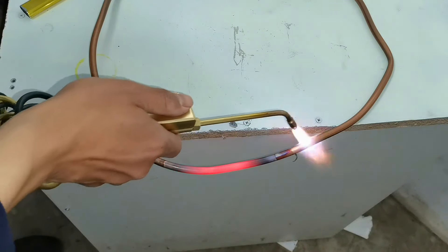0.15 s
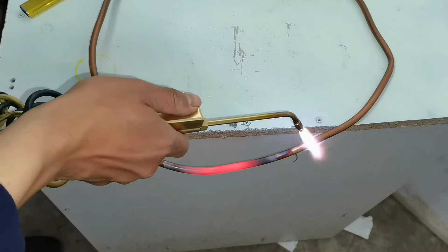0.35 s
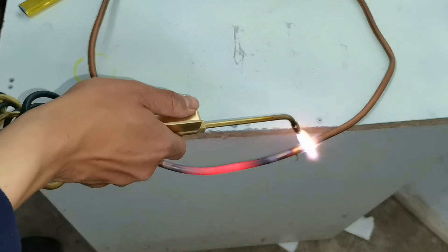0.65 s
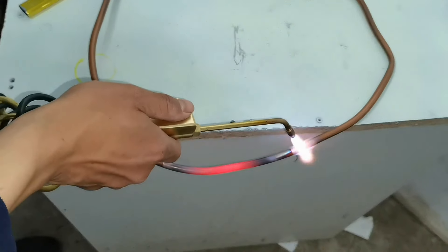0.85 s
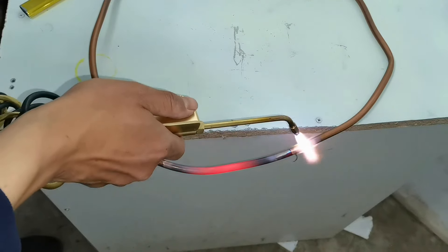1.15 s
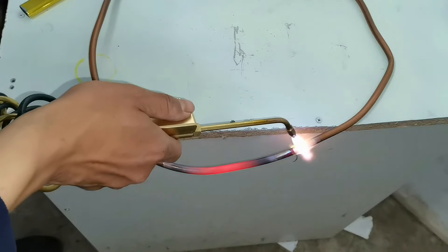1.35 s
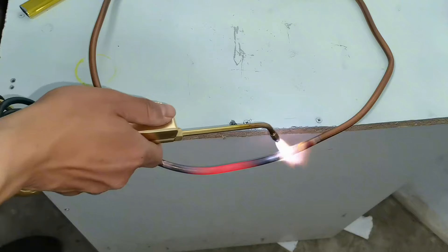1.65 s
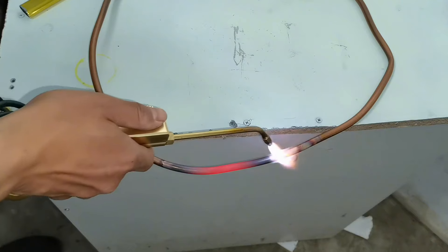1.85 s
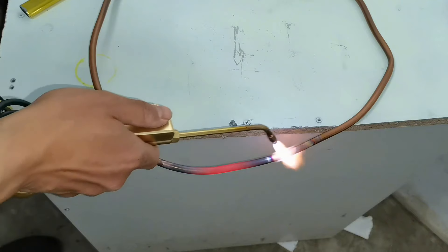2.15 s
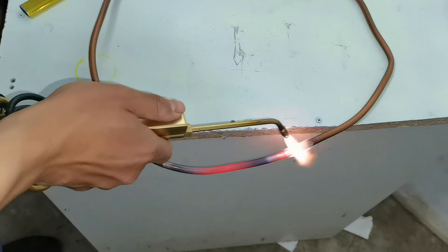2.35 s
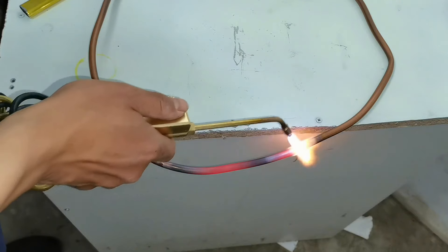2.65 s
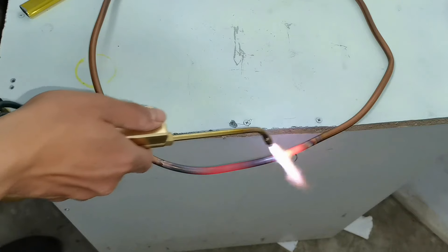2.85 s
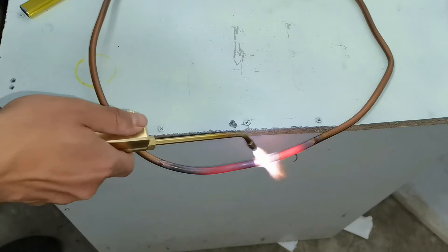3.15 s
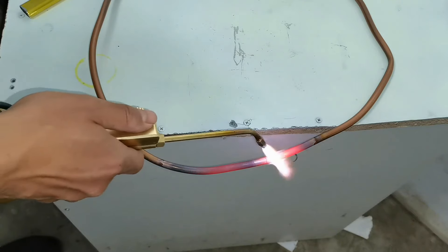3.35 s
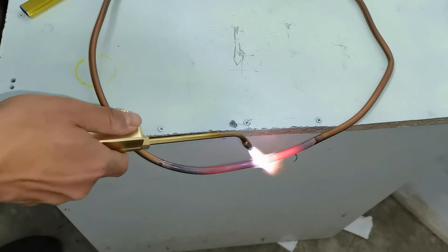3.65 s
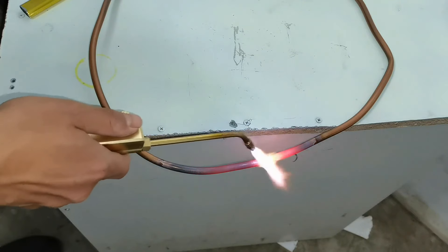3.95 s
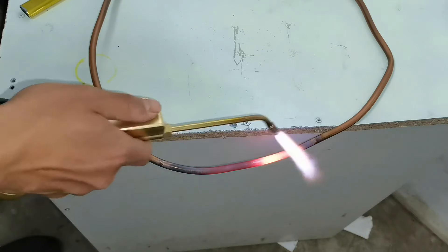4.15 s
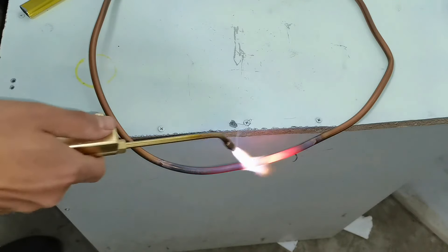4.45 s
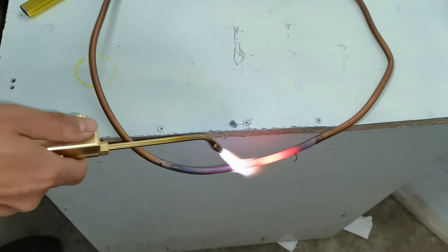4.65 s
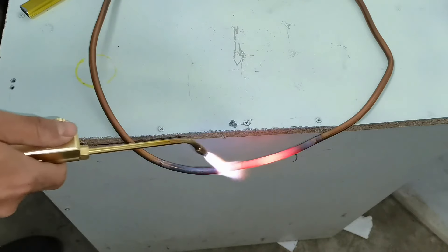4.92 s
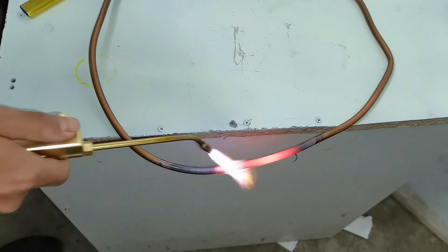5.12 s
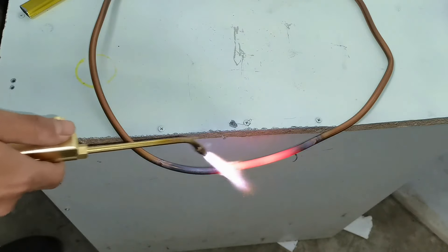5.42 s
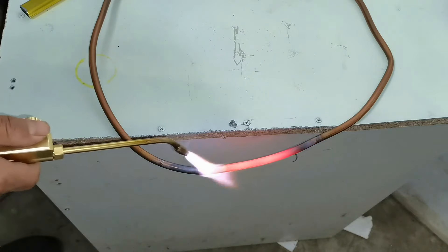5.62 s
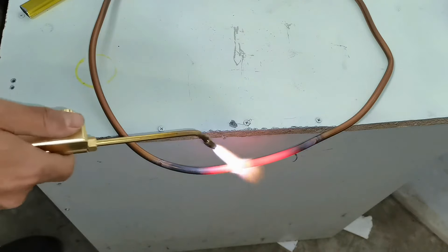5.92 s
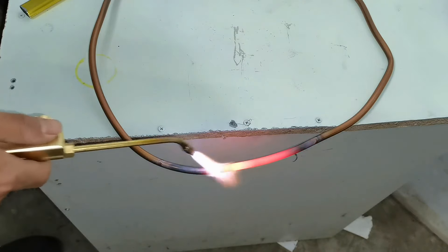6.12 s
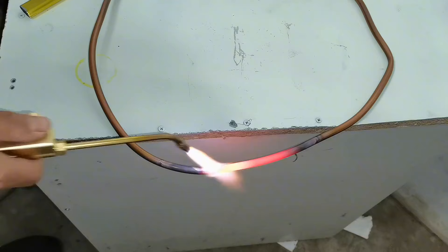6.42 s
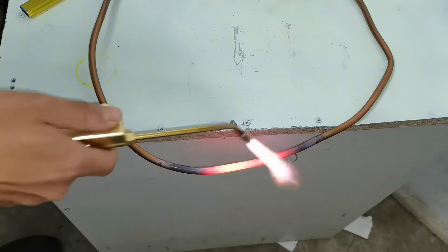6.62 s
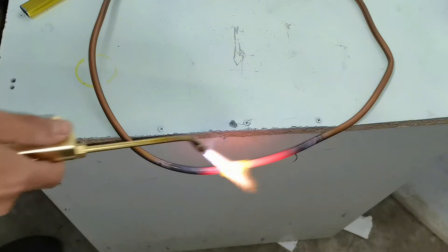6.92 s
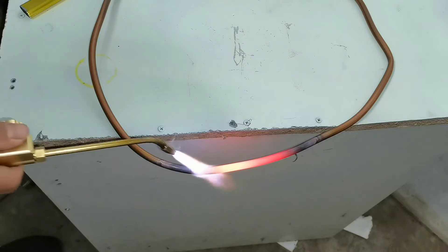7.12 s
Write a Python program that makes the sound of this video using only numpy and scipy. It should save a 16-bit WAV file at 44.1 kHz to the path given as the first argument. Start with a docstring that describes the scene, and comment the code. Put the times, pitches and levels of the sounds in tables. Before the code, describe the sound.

From 0 s a gas torch is already burning close to the microphone, giving a dense, bright, unbroken hiss strongest in the upper mids and treble. A faint fast flutter roughens it. Beneath is a quiet low purr of flame against a copper pipe. Brief soft roars come at about 0.4, 0.9 and 1.4 s, then at 2.7 and in a cluster from 3.2 s. At 3.8-4.3 s the flame burns free with a longer fluttering roar and a small surge in the hiss. More low puffs follow near 4.6, 5.2 and 6.2 s, then a fuller flare at 6.5-6.9 s with another surge. The hiss climbs gradually throughout, several decibels louder by 7.3 s, its color and position drifting slightly as the torch moves. Hard workshop walls add short, diffuse reflections; low rumble wavers faintly underneath. It ends still burning.

```python
"""A gas torch's jet hisses, ever louder: shaped noise for the eddies sheared off at the nozzle.
Its flame purrs against a copper pipe and flares into a fluttering roar when it slips past and burns free.
The hand moves the torch along the pipe: delays drift the hiss sideways and slide its reflections.
The hard-walled workshop adds diffuse noise tails and a low rumble; the microphone is close."""
import sys
import numpy as np
from scipy import signal
from scipy.fft import rfft, irfft
from scipy.io import wavfile
from scipy.ndimage import uniform_filter1d, map_coordinates

SR = 44100
rng = np.random.default_rng(int(sys.argv[2]) if len(sys.argv) > 2 else 0)


def int16_out(signal):
    """Quantize to a 16-bit WAV file."""
    q = np.round(np.clip(np.atleast_2d(signal).T, -1, 1) * 32767)
    wavfile.write(sys.argv[1], SR, q.astype(np.int16))


N = 321048
TIME_S = np.arange(N) / SR
FRAME_S = np.arange(N // 256 + 5) * 256 / SR
BIN_HZ = np.fft.rfftfreq(1024, 1 / SR)

# jet growing louder, before trim: start_s, level_db
JET_LEVEL = [(0, -24), (0.3, -23.5), (0.5, -22.5), (1.15, -22), (2.0, -21), (2.45, -22), (2.9, -20.5),
             (3.28, -21), (4.15, -20), (4.58, -19.5), (5.05, -19.5), (5.9, -19), (6.55, -20), (6.82, -18.7),
             (7.28, -18.5)]
# torch place as lag of left ear behind right: start_s, left_lag_ms
TORCH_PLACE = [(0, 0.03), (1.2, 0.023), (1.6, 0.009), (2.5, 0.024), (3.05, -0.016), (3.3, -0.0061),
               (4.2, -0.00035), (4.5, -0.038), (4.9, -0.079), (5.3, -0.045), (5.6, -0.1), (6, -0.058),
               (6.35, -0.12), (6.65, -0.019), (6.85, -0.039), (7.05, -0.1)]
# relative jet spectrum, nozzle close to pipe or drawn back: freq_hz, close_db_per_hz, back_db_per_hz
HISS_COLOUR = [(200, -36, -37), (720, -27, -25), (950, -19.5, -22), (1650, -16.2, -17.8),
               (2200, -11.8, -12.2), (3060, -7.8, -6), (3380, -2.2, -5.2), (4300, -.8, -3.1),
               (5200, -.7, -1.4), (6500, -1.1, -1.9), (8050, -2.7, -4.4), (8850, -7.6, -8.2),
               (11000, -8.5, -8.8), (13000, -10.8, -11.9), (15200, -13, -12.9)]
# nozzle withdrawal: start_s, share_0_to_1
DRAWN_BACK = [(0, 0.4), (1.8, 0.3), (3.6, 0.25), (4.2, 0.8), (4.6, 1), (7.28, 0.85)]
# narrow hiss resonances, each strongest at one torch place: freq_hz, gain_db, place_ms
RINGS = [(2070, 2, 0.013), (2480, -2, -0.061), (2880, 5, -0.07), (3220, 6.5, 0.0043), (3470, 7, -0.0071),
         (3740, 5.5, 0.014), (3850, 3, -0.013), (4560, 4.5, 0.016), (4970, 3, 0.014), (5170, 5.5, -0.069),
         (5860, 1, -0.07), (6580, 3.5, 0.0049), (7540, 7.5, -0.0063), (8000, 6, 0.0096)]
RING_WIDTH_HZ, RING_REACH_MS = 80, 0.039
# hiss surges where the flame swings wholly clear of the pipe: middle_s, length_s, gain_db
SURGES = [(4.24, 0.24, 1.1), (6.76, 0.28, 0.8)]
SURGE_HZ, SURGE_WIDTH_HZ = 5960, 2300
# relative flame spectrum: freq_hz, level_db_per_hz
ROAR_COLOUR = [(25, -32), (50, -33), (90, -27), (120, -3.5), (165, -0.5), (220, 1), (310, 0), (410, -4.5),
               (540, -9), (700, -11), (920, -8.5), (1400, -16), (3000, -14)]
# flame slips past the pipe and burns free; levels before trim: start_s, length_s, level_db
FLARES = [(-0.05, 0.085, -42), (0.37, 0.32, -43), (0.89, 0.49, -45.5), (1.407, 0.12, -40.5),
          (2.72, 0.18, -41), (3.18, 0.17, -42), (3.345, 0.15, -41.5), (3.55, 0.13, -46), (3.838, 0.5, -40),
          (4.35, 0.12, -45), (4.614, 0.48, -46), (5.183, 0.24, -40), (6.154, 0.27, -40), (6.517, 0.4, -39),
          (7.06, 0.25, -50)]
FLARE_ATTACK_TANH_S, FLARE_RELEASE_TANH_S = 0.033, 0.045
# purr against the pipe, before trim
PURR_START_DB, PURR_RISE_DB_PER_S = -50, 0.47
# low workshop mode
BOOM_HZ, BOOM_WIDTH_HZ, BOOM_DB = 216, 42, 2
# mirror paths off board, bench, floor: extra_delay_ms, delay_slope_ms_per_place_ms, gain_db
MIRRORS = [(.3, -0.9, -26), (.74, -2, -54), (1.58, 3.3, -35), (2.45, -3.5, -15), (4.55, -1.6, -17)]
# diffuse sound against direct: freq_hz, level_db, t60_s
ROOM = [(100, -42, .3), (302, -12, 0.22), (597, 2.5, 0.087), (1240, 3, 0.13), (3450, 2.5, 0.087),
        (6500, 0, 0.15), (11800, 11, 0.041), (15000, 2, 0.076)]
# relative rumble spectrum: freq_hz, level_db_per_hz
RUMBLE_COLOUR = [(15, -36), (26, -17), (42, -3), (60, 0), (90, -5), (130, -5), (300, -6), (1000, -18),
                 (5000, -37)]
# rumble swelling and sinking, before low cut: start_s, level_db
RUMBLE_LEVEL = [(0, -64), (1.2, -62), (2.2, -71), (3.2, -63), (4.2, -60), (5, -62.5), (6, -63), (6.6, -59),
                (7.28, -57)]
# microphone port resonances: freq_hz, left_minus_right_db, left_lead_rad
PORTS = [(220, 1.4, -0.25), (500, 0.4, -0.45), (2500, 1.3, -0.19), (5100, 0.4, 0.38), (7000, 3.6, -0.58),
         (7630, 9, 0.63), (8650, 1.5, -0.57), (9800, -5, -2.7), (10300, -1, -0.36), (11700, -7.5, .9),
         (12600, 0.5, .4)]
DIP_RATE_HZ, FIRST_DIP_S, DIP_WIDTH_S, DIP_DB = 39.976, .0024, .0058, -1.8
EDGE_HZ = 15560


def jet(level_db=-3.0, patchy_db=1.07, fizz_db=-1.26, rush_db=0.83, unsteady_db=0.17,
        fizz_wander_db=0.02, rush_wander_db=0.5, flare_fizz_db=-1.8, count=4):
    """Gas shears at the nozzle: small eddies fizz, large ones rush, flares dull the fizz; one noise per ray."""
    hiss_db = along(JET_LEVEL, FRAME_S)[0] + unsteady_db * wander(FRAME_S, 5, 25)
    flare = flaring(FRAME_S)
    fizz = fizz_db + fizz_wander_db * wander(FRAME_S, 0.91, 8)
    fizz += flare_fizz_db * (flare - flare.mean()) / flare.max()
    rush = rush_db + rush_wander_db * wander(FRAME_S, 0.99, 8)

    close_db, back_db = across(HISS_COLOUR, BIN_HZ)
    back = np.clip(along(DRAWN_BACK, FRAME_S)[0], 0, 1)[:, None]
    field_db = (1 - back) * close_db + back * back_db + clutter() + rings()
    field_db += np.outer(fizz, np.interp(BIN_HZ, [7000, 10000], [0, 1]))
    field_db += np.outer(rush, np.interp(BIN_HZ, [1700, 3000], [1, 0]))
    # direct and diffuse sound share the jet's power
    field_db -= 10 * np.log10(1 + gain_of(across(ROOM, BIN_HZ)[0]) ** 2)
    # level each frame's core band: colour alone leaves hiss strength unchanged
    core = (BIN_HZ > 3000) & (BIN_HZ < 8000)
    core_power = np.mean(gain_of(field_db[:, core]) ** 2, axis=1, keepdims=True)
    field_db -= 10 * np.log10(core_power)

    eddies = uniform_filter1d(rng.standard_normal(field_db.shape), size=10, axis=0)
    eddies = uniform_filter1d(eddies, size=24, axis=1)
    field_db += patchy_db * evened(eddies) + surges()
    hiss = np.array([noise(field_db, (3000, 8000)) for _ in range(count)])
    return hiss * gain_of(level_db + np.interp(TIME_S, FRAME_S, hiss_db))


def clutter(scatter=0.55, count=16, frame_step=8):
    """Short bench reflections comb the hiss; ripples slide with the torch: frames x bins (dB)."""
    place_ms = along(TORCH_PLACE, FRAME_S[::frame_step])[0][:, None]
    # columns: delay_ms, delay_slope_ms_per_place_ms
    paths = rng.uniform([3.5, -2.5], [9, 2.5], (count, 2))
    echoes = 0
    for delay_ms, slope in paths:
        path_s = (delay_ms + slope * place_ms) / 1000
        echoes = echoes + np.exp(2j * np.pi * BIN_HZ * path_s)
    comb_db = 20 * np.log10(abs(1 + scatter * echoes / np.sqrt(count)))
    return np.repeat(comb_db, frame_step, axis=0)[:len(FRAME_S)]


def rings():
    """Resonances come and go as the nozzle passes their places: frames x bins (dB)."""
    place_ms = along(TORCH_PLACE, FRAME_S)[0]
    return sum(
        gain_db * np.outer(bell(place_ms - at_ms, RING_REACH_MS), bell(BIN_HZ - hz, RING_WIDTH_HZ))
        for hz, gain_db, at_ms in RINGS)


def surges():
    """The free jet strengthens in one broad band: frames x bins (dB)."""
    swell_db = sum(db * bell(FRAME_S - middle_s, length_s) for middle_s, length_s, db in SURGES)
    return np.outer(swell_db, bell(BIN_HZ - SURGE_HZ, SURGE_WIDTH_HZ))


def flame(level_db=-1.4, flutter_db=1.45, count=4):
    """Uneven burning puffs the air: one fluttering low noise, time-shifted per ray, purrs and flares."""
    colour_db = across(ROAR_COLOUR, BIN_HZ)[0] + BOOM_DB * bell(BIN_HZ - BOOM_HZ, BOOM_WIDTH_HZ)
    roar = noise(colour_db, (110, 450))
    rays = np.array([np.roll(roar, k * N // count) for k in range(count)])
    purr = gain_of(PURR_START_DB + PURR_RISE_DB_PER_S * TIME_S)
    burning = np.hypot(purr, flaring(TIME_S))
    flutter = np.interp(TIME_S, FRAME_S, wander(FRAME_S, 7, 45))
    return rays * burning * gain_of(level_db + flutter_db * flutter)


def flaring(t_s):
    """Flare amplitude: each flare swells as the flame slips free, then dies away."""
    total = 0
    for start_s, length_s, level_db in FLARES:
        attack = eased((t_s - start_s) / FLARE_ATTACK_TANH_S)
        release = eased((start_s + length_s - t_s) / FLARE_RELEASE_TANH_S)
        total = total + gain_of(level_db) * attack * release
    return total


def near_paths(x, place_ms):
    """Direct sound plus mirror images, combing as the torch moves; interaural lag sets the side."""
    images = sum(gain_of(db) * delayed(x, ms + slope * place_ms) for ms, slope, db in MIRRORS)
    x = x + images
    return np.array([delayed(x, place_ms / 2), delayed(x, -place_ms / 2)])


def workshop(rays, place_ms, turns_per_ms=8.82, sway_turns=0.15):
    """Hard walls diffuse each ray through its own decaying noise tail; torch place shifts the mix."""
    count = len(rays)
    hz, t_s, grains = signal.stft(rng.standard_normal((count, 2, SR // 3)), SR, nperseg=256)
    wet_db, t60_s = across(ROOM, hz)
    decay = gain_of(-60 * t_s / t60_s[:, None])
    # tail energy per band follows wet_db; 128 is the frame hop
    decay *= gain_of(wet_db)[:, None] / np.sqrt((decay ** 2).sum(1, keepdims=True) * 128)
    tails = signal.istft(grains * decay, SR, nperseg=256)[1]

    sway = np.interp(TIME_S, FRAME_S, wander(FRAME_S, 0.304, 3))
    turn = turns_per_ms * place_ms + sway_turns * sway
    ray_turn = np.arange(count)[:, None] / count
    feeds = np.sqrt(2 / count) * np.cos(2 * np.pi * (turn + ray_turn))
    # torch already burning: room full at the start
    full = np.pad(rays * feeds, ((0, 0), (tails.shape[-1] - 1, 0)), "reflect")
    return sum(signal.fftconvolve(ray[None], tail, "valid", axes=1) for ray, tail in zip(full, tails))


def rumble(apart_db=-8, low_cut_hz=42):
    """Low background noise, nearly alike at both ears, with little deepest bass."""
    colour_db = across(RUMBLE_COLOUR, BIN_HZ)[0]
    shared, apart = (noise(colour_db, (25, 110)) for _ in range(2))
    ears = shared + gain_of(apart_db) * np.array([apart, -apart])
    low_cut = signal.butter(2, low_cut_hz, "highpass", fs=SR, output="sos")
    return gain_of(along(RUMBLE_LEVEL, TIME_S)[0]) * signal.sosfilt(low_cut, ears)


def gain_of(db):
    """Decibels to amplitude."""
    return 10 ** (np.asarray(db) / 20)


def evened(x):
    """Scale to rms 1."""
    return x / np.sqrt(np.mean(x ** 2) + 1e-20)


def along(rows, t_s):
    """Table columns interpolated at times t_s."""
    s, *columns = np.transpose(rows)
    return [np.interp(t_s, s, c) for c in columns]


def across(rows, hz):
    """Table columns interpolated over log frequency."""
    f, *columns = np.transpose(rows)
    return [np.interp(np.log(hz + 1), np.log(f + 1), c) for c in columns]


def wander(t_s, slow_hz, fast_hz):
    """Random-phase sines between two rates, summed to rms 1."""
    rates_hz = np.geomspace(slow_hz, fast_hz, num=40)
    return evened(sum(np.sin(2 * np.pi * (f * t_s + rng.random())) for f in rates_hz))


def noise(field_db, band_hz):
    """Noise coloured by a spectrum or frames x bins field, scaled to rms 1 within band_hz."""
    real, imag = rng.standard_normal((2, len(FRAME_S), len(BIN_HZ)))
    gain = gain_of(field_db)
    x = signal.istft(((real + 1j * imag) * gain).T, nperseg=1024, noverlap=768)[1][:N]
    inside = (BIN_HZ > band_hz[0]) & (BIN_HZ < band_hz[1])
    return evened(x) * np.linalg.norm(gain) / np.linalg.norm(gain * inside)


def delayed(x, ms):
    """Read x late by a moving delay."""
    return map_coordinates(x, [np.arange(N) - ms * SR / 1000], order=3, mode="mirror")


def bell(x, width):
    """Smooth bump of height 1, width wide at half height."""
    return .5 ** ((2 * x / width) ** 2)


def eased(x):
    """Smooth step from 0 to 1, halfway at x = 0."""
    return .5 * (1 + np.tanh(x))


def scene():
    """Jet and flame share one moving spot: first ray meets the microphone, the others the walls."""
    rays = jet() + flame()
    place_ms = along(TORCH_PLACE, TIME_S)[0]
    return near_paths(rays[0], place_ms) + workshop(rays[1:], place_ms) + rumble()


def record(dry):
    """Ports colour each side; the level dips briefly about forty times a second; a low-pass ends the band."""
    balance_db, lead_rad = across(PORTS, np.fft.rfftfreq(N, 1 / SR))
    left = gain_of(balance_db / 2) * np.exp(1j * lead_rad / 2)
    x = irfft(rfft(dry) * np.array([left, 1 / left]), N)
    # signed time to the nearest dip
    from_dip_s = (((TIME_S - FIRST_DIP_S) * DIP_RATE_HZ + .5) % 1 - .5) / DIP_RATE_HZ
    x = x * gain_of(DIP_DB * bell(from_dip_s, DIP_WIDTH_S))
    low_pass = signal.firwin(1023, EDGE_HZ, window=("kaiser", 9), fs=SR)
    return signal.oaconvolve(x, low_pass[None], "same")


dry = scene()
out = record(dry)
int16_out(out)
```